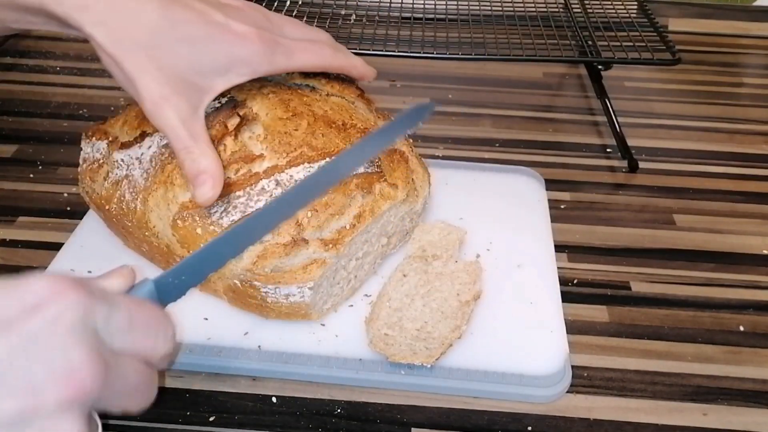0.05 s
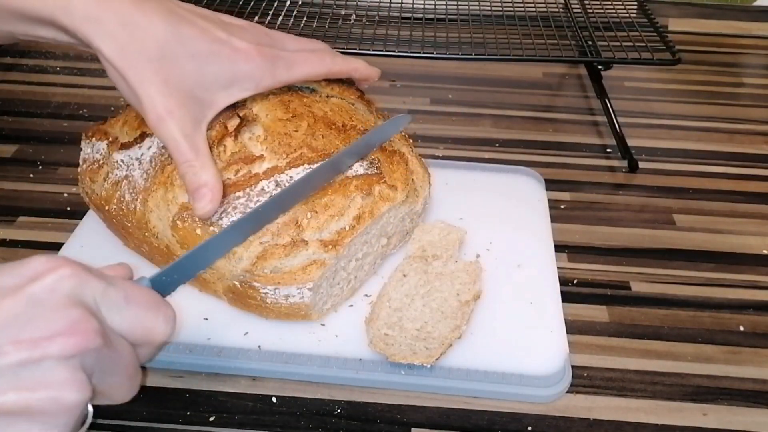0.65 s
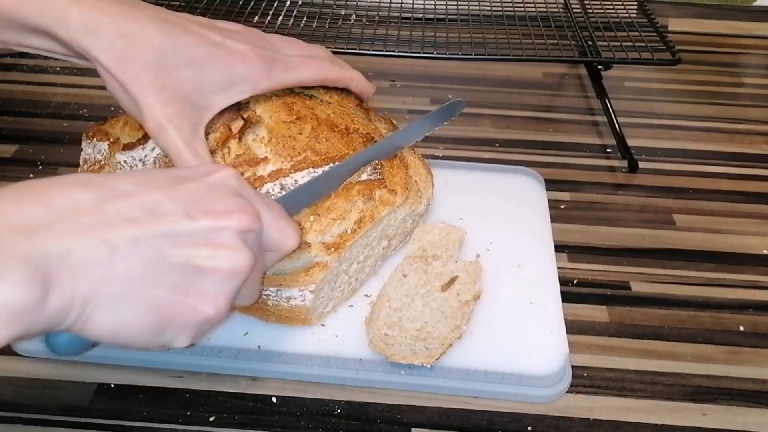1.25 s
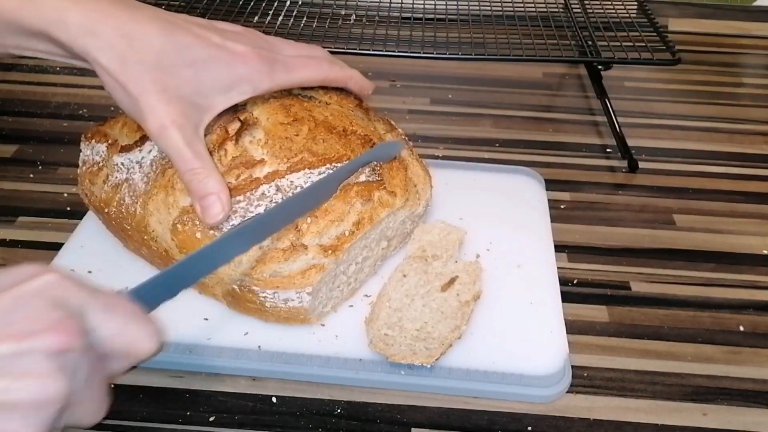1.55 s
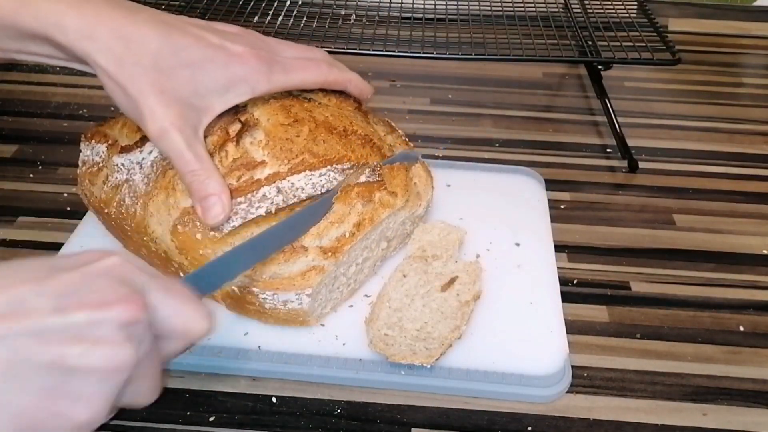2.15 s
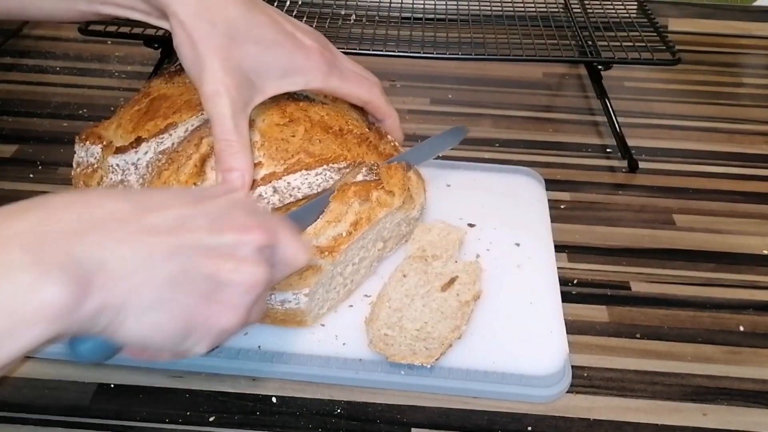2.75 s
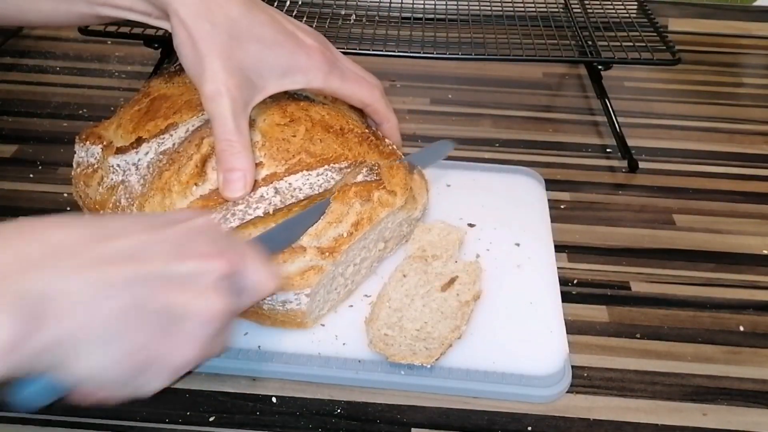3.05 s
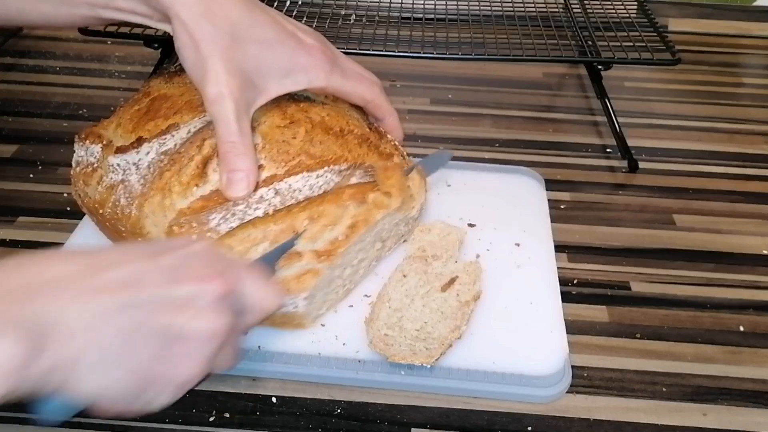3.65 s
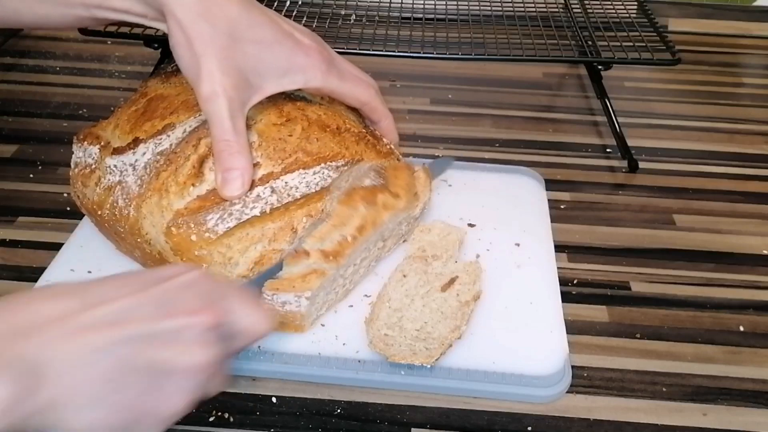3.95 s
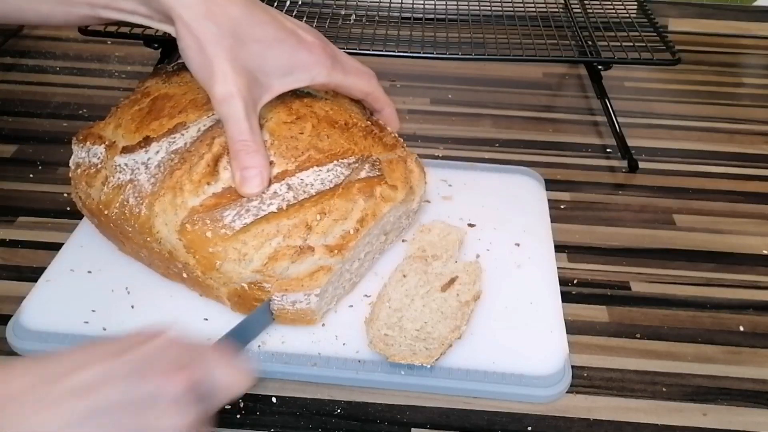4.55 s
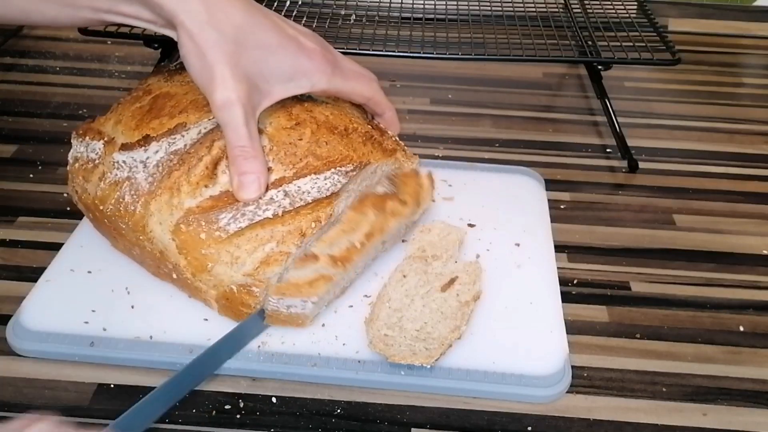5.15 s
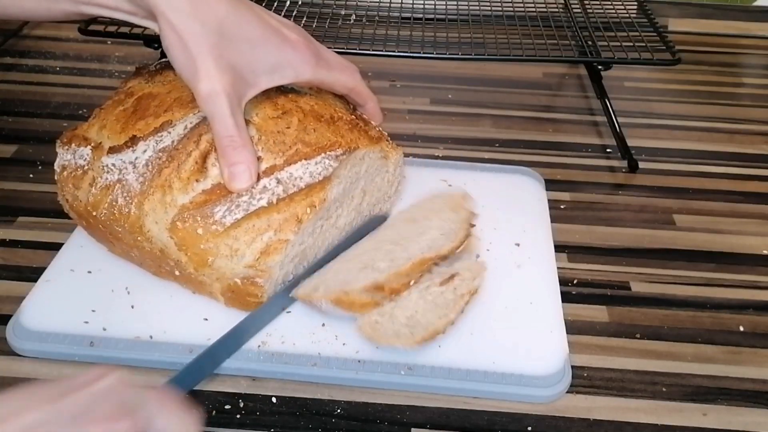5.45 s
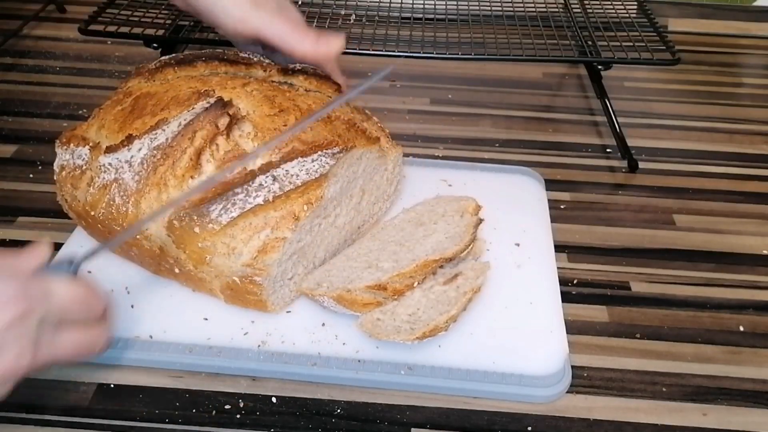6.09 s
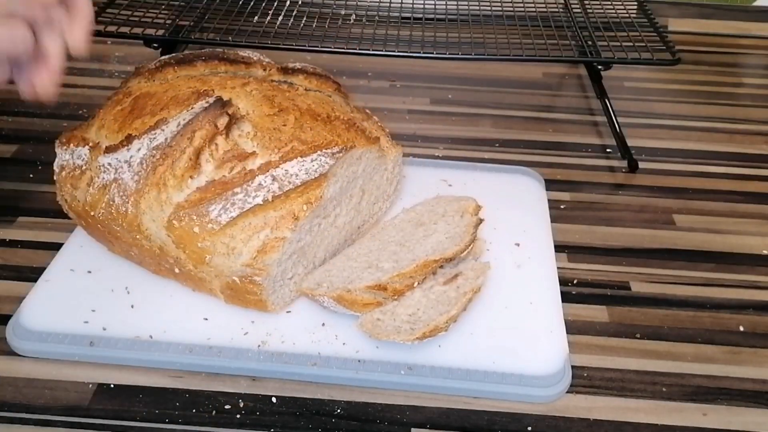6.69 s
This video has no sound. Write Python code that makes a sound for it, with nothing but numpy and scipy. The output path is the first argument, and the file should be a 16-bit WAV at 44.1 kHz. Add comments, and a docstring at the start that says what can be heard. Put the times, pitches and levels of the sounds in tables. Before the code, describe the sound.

A serrated knife saws through a crusty loaf with crackling strokes, catches on a plastic board and scrapes the slice aside.

```python
"""In a small kitchen, close by, a serrated knife saws a crusty loaf on a plastic board.
With each push and pull its teeth crack the crust in clumps of tiny breaks and shake loaf and board.
Now and then a big flake snaps, or the moist inside grips the blade and groans. At the bottom the
blade catches on the board, then scrapes the slice aside. Underneath are the rumble of the rocking
loaf, a faint brushing of hand and blade on the crust, a short echo and a low, steady background."""
import sys
import numpy as np
from scipy import signal
from scipy.fft import rfft, irfft
from scipy.io import wavfile
from scipy.ndimage import uniform_filter1d, map_coordinates

SR = 44100
rng = np.random.default_rng(int(sys.argv[2]) if len(sys.argv) > 2 else 0)


def bounce(signal):
    """Save signal as a 16-bit WAV file at the path given by the first command-line argument."""
    frames = np.transpose(np.atleast_2d(signal))
    limited = np.clip(frames, -1, 1)
    pcm = np.round(limited * 32767).astype(np.int16)
    wavfile.write(sys.argv[1], SR, pcm)


N = 300938

# Levels in the tables are relative: the functions set the final balance.
# each push or pull of the knife: (time of full grip [s], length [s], run-up [s], swell [dB],
# board thump [dB], loaf knock [dB], crunch [dB], splinters [dB], blade ring [dB], pitch of the cut [Hz])
STROKES = [(0.493, 0.07, 0.014, 4, -61.5, -63, -67, -76, -74, 316),
           (0.643, 0.14, 0.0071, 5, -59, -66, -60.5, -60.5, -65, 348),
           (0.957, 0.11, 0.17, 0.5, -53, -51, -53.5, -52, -51.5, 290),
           (1.089, 0.21, .096, -2.5, -48.5, -46.5, -47, -49, -45, 227),
           (1.418, 0.17, .05, -1, -54, -49.5, -51, -46.5, -57, 344),
           (1.717, 0.096, 0.042, 2, -46, -44, -49, -45, -49, 328),
           (1.873, 0.084, 0.025, -2.5, -50.5, -43, -38.5, -43, -45, 510),
           (2.086, 0.11, 0.063, -.5, -47.5, -44, -42.5, -45, -49.5, 211),
           (2.29, 0.05, 0.069, 1, -64.5, -74, -63, -70, -65, 560),
           (2.604, 0.12, 0.087, 1, -53.5, -41.5, -36, -42.5, -41, 550),
           (2.856, 0.098, 0.1, 3.5, -53, -46.5, -43.5, -46.5, -48.5, 564),
           (3.097, .11, 0.081, -8, -48, -45, -42, -45, -48.5, 370),
           (3.317, .1, 0.043, -1.5, -63, -41.5, -44.5, -47.5, -50, 464),
           (3.521, 0.11, .018, 0.5, -51.5, -46.5, -43, -42.5, -61, 350),
           (3.776, 0.065, 0.11, 0, -72, -46.5, -44, -47, -52.5, 390),
           (3.949, 0.13, .014, 6.5, -48.5, -48.5, -46.5, -44.5, -51.5, 222),
           (4.249, 0.019, .13, -1.5, -64.5, -49.5, -49.5, -58, -62, 228),
           (4.358, 0.094, .018, 6, -62, -55.5, -46.5, -52, -49.5, 230),
           (4.6, .037, 0.11, -2, -61, -62, -54.5, -61.5, -54, 190),
           (4.836, 0.018, .12, 0, -62, -60, -50.5, -54.5, -52.5, 602),
           (4.986, 0.13, .11, -11.5, -53.5, -48, -46, -53, -53.5, 547),
           (5.194, 0.077, 0.18, -1, -43.5, -46, -44, -51, -49.5, 530)]
# big flakes of crust snapping: (time [s], level [dB], knock compared with the crack [dB])
SNAPS = [(0.4932, -51, 5), (0.6522, -36, -7), (0.7012, -29, -20), (0.7302, -36, -17), (0.7547, -30, -17),
         (0.8929, -39, -12), (1.0869, -29, -11), (1.1618, -27, -13), (1.2511, -26, -18), (1.3054, -29, -14),
         (1.4062, -33, -15), (1.474, -31, -16), (1.7093, -25, -19), (1.7198, -28, -14), (1.759, -26, -5),
         (1.8721, -29, -4), (2.4445, -38, -14), (2.577, -27, -2), (2.6219, -27, -7), (2.7053, -25, -13),
         (2.9148, -29, -1), (3.0864, -27, -1), (3.1837, -26, -15), (3.3195, -29, 0), (3.4105, -29, 0),
         (3.5144, -34, -5), (3.5584, -28, -6), (3.8672, -27, -20), (3.9464, -32, -13), (4.0785, -29, -3),
         (4.4144, -26, -14), (4.466, -22, -13), (5.0764, -27, -18), (5.437, -31, -20), (5.7902, -35, -24)]
# the teeth catching on the board: (time [s], level [dB], pitch [Hz], time to fade by 60 dB [s])
CATCHES = [(4.411, -42, 1680, 0.27), (4.465, -42.5, 2180, 0.16), (4.855, -38.5, 1290, 0.068),
           (4.974, -34.5, 1090, 0.13), (5.171, -39, 785, 0.33)]
# the flat blade shoving the slice aside:
# (time of full grip [s], length [s], run-up [s], swell [dB], board thump [dB], scrape [dB])
SHOVES = [(5.463, 0.14, .115, -13.5, -51.5, -36.5), (5.69, 0.072, .043, -5, -58.5, -46.5)]
# the soft bread gripping the blade: (middle time [s], length [s], pitch [Hz], level [dB])
GROANS = [(1.175, .12, 215, -45), (1.805, .12, 338, -40), (2.14, .1, 215, -44)]
# the loaf rocking slowly under the hand: (time [s], level [dB])
ROCKING = [(0.6, -85), (0.66, -77), (2.26, -60), (2.28, -69), (3.44, -51.5), (3.93, -68), (4.05, -45),
           (4.18, -61), (5.74, -66), (5.8, -77)]
# hand and blade brushing the floury crust: (middle time [s], half-length [s], level [dB])
BRUSHES = [(.08, .045, -76), (6.355, 0.44, -89), (6.783, 0.039, -77)]

# the notes at which each thing rings: (pitch [Hz], width [Hz], level [dB])
LOAF_NOTES = [(204.5, 31.4, 2.5), (247.4, 23, 0), (295, 22, -0.5), (339, 49, 2.5), (449, 59, -1.5),
              (543, 44, -5.5), (630, 64, -5)]  # the body of the loaf
SHELL_NOTES = [(705, 35, -4), (778, 15, 0.5), (855, 32, -5.5), (941, 32, -4), (1012, 45, -3.5),
               (1302, 124, -6), (1477, 146, -4), (1895, 350, -7), (2090, 310, -7.5)]  # the hollow shell of crust
BLADE_NOTES = [(2740, 250, 6.5), (3640, 450, 1), (5000, 340, -7), (7630, 220, -6), (9700, 230, -9.5)]  # steel, damped by the bread
BOARD_NOTES = [(122.5, 39, 0)]  # the board on the worktop
PLASTIC_NOTES = [(475, 41, -9.5), (615, 9.9, -1.5), (816, 21, -3), (1032, 95, -5), (1310, 170, -7.5),
                 (2195, 130, -6)]  # the plastic under the sliding blade

# the tone of each sound, from bass to treble: (frequency [Hz], level [dB])
CRUNCH_TONE = [(300, -18), (600, 1.5), (900, 7.5), (1400, 0.5), (2500, -3.5), (4000, -27)]  # crust giving way
SPLINTER_TONE = [(1300, -28), (2300, 0.5), (3300, 3), (4200, 0), (5500, 2), (7500, -5.5), (10000, -7),
                 (12000, -15.5), (15000, -25)]  # tiny, bright splinters
CRACK_TONE = [(300, -14), (1200, -2), (3000, -.5), (5500, -5), (10000, -12.5), (15000, -26)]  # a big flake breaking
SCRAPE_TONE = [(200, -8), (450, -0.5), (1100, 1), (2300, -1.5), (3000, -7), (4000, -14), (5200, -17.5),
               (7000, -27), (15000, -52)]  # the slice rubbing over the board
BRUSH_TONE = [(1500, -31), (3000, -3), (7500, -6), (9500, -4), (15000, -17)]  # a light touch on the crust
SCATTER_TONE = [(120, -12), (280, -19.5), (550, -6.5), (1000, -2), (2200, -2.5), (6000, 1.5)]  # sound thrown sideways by the worktop and things on it
ECHO_TONE = [(100, -19.5), (700, -4), (14000, -1)]  # the kitchen's echo, compared with the direct sound
BACKGROUND_TONE = [(15, -15), (25, -7), (60, -9.5), (120, -10), (170, -11.5), (500, -18.5), (1200, -25),
                   (5000, -32), (10000, -42), (15000, -54)]  # the quiet room

RUN_UP_DB, BULGE_DB, STOP_DB_PER_S = 20, 1.8, 207  # a stroke's rise, bump at top speed and final fall
HOLLOW_WIDTH_HZ, HOLLOW_DB = 160, -2.5  # the cut's note; level compared with the loaf's own notes
CRUMBLE_S, GIVE_S, ECHO_S = .017, .04, .19  # times to fade by 60 dB
SAW_SMEAR_S, SNAP_SMEAR_S = .015, .007  # how long the nearest reflections blur a sound
BACKGROUND_DB, TOP_HZ = -69.5, 15300


def sawing():
    """Teeth break the crust; the breaks hiss, ring blade and shell, knock the loaf and shake the board."""
    shake, knock, crunch, splinter, ring = stroke_gains([row[:-1] for row in STROKES])
    # each bite starts a small shower of breaks that dies away
    bite = .55 + teeth(per_s=85, uneven=.6, hold_s=.005, spread_db=4)
    breaks = bite * clicks(per_s=2500, spread_db=4.5)
    grit = coloured(bite * clicks(per_s=2200, spread_db=2), CRUNCH_TONE)
    shell = unit(ringing(breaks, SHELL_NOTES)) + amp(-1.5) * unit(grit)
    loaf = unit(ringing(breaks, LOAF_NOTES)) + amp(HOLLOW_DB) * unit(cut_hollow(breaks))
    crackle = coloured(bite * clicks(per_s=3000, spread_db=2.5), SPLINTER_TONE)
    steel = ringing(bite * clicks(per_s=2600, spread_db=4), BLADE_NOTES)
    return (amp(3.25) * shake * levelled(board_thump(breaks), span_s=.064)
            + amp(.6) * knock * levelled(loaf, span_s=.035)
            + amp(-1.5) * crunch * levelled(shell, span_s=.031)
            + amp(-3.5) * splinter * levelled(crackle, span_s=.039)
            + amp(-3) * ring * levelled(steel, span_s=.04))


def stroke_gains(rows):
    """One loudness curve per level column: a stroke speeds up, grips, and dies as the blade stops."""
    power = np.zeros((len(rows[0]) - 4, N))
    for time, length, run_up, swell_db, *levels_db in rows:
        near = slice(max(round(time * SR) - SR // 2, 0), round(time * SR) + SR // 2)
        t = np.arange(near.start, near.stop) / SR - time
        travel = np.clip(t / length, 0, 1)
        grip_db = swell_db * (travel - .5) + BULGE_DB * (np.sin(np.pi * travel) - 2 / np.pi)
        slack_db = RUN_UP_DB * np.maximum(-t, 0) / run_up + STOP_DB_PER_S * np.maximum(t - length, 0)
        power[:, near] += np.outer(amp(levels_db), amp(grip_db - slack_db)) ** 2
    return np.sqrt(power)


def teeth(per_s, uneven, hold_s, spread_db):
    """Each passing tooth bites at once, then gradually lets go."""
    teeth_passed = np.floor(np.cumsum(per_s * np.exp(uneven * wobble(60))) / SR)
    strength = amp(spread_db * np.clip(rng.standard_normal(N), -2, 2))
    bites = (np.diff(teeth_passed, prepend=0) > 0) * strength
    return unit(signal.lfilter([1], [1, -np.exp(-1 / (hold_s * SR))], bites))


def clicks(per_s, spread_db):
    """Tiny breaks or slips click at random moments: many small, a few large."""
    happens = rng.random(N) < per_s / SR
    size = amp(spread_db * np.clip(rng.standard_normal(N), -3, 2.6))
    return unit(happens * size * rng.choice([-1, 1], N))


def cut_hollow(x):
    """The hollow opened by the cut rings at one pitch per stroke and shifts as the blade turns round."""
    turns = [(when, hz) for time, length, *_, hz in STROKES for when in (time, time + length)]
    pitch = np.interp(np.arange(N) / SR, *np.transpose(turns))
    spin = np.exp(2j * np.pi * np.cumsum(pitch) / SR)
    # slide the pitch down to 0 Hz, keep a narrow band, slide it back up
    band = signal.lfilter(*signal.butter(2, HOLLOW_WIDTH_HZ / 2, fs=SR), x / spin)
    return np.real(spin * band)


def board_thump(x):
    """The board bounces on the worktop at one low pitch."""
    return ringing(ringing(x, BOARD_NOTES), BOARD_NOTES)


def flake_snaps():
    """A flake cracks and crumbles; the crust around it gives way and knocks shell, loaf and board."""
    cracks, knocks = np.zeros((2, N))
    t = np.arange(SR // 20) / SR
    click = t == 0
    for time, db, knock_db in SNAPS:
        start = round(time * SR)
        grit = .16 * rng.standard_normal(len(t))
        cracks[start:start + len(t)] += amp(db) * (click + grit * amp(-60 * t / CRUMBLE_S))
        knocks[start:start + len(t)] += amp(db + knock_db) * (click + grit * amp(-60 * t / GIVE_S))
    crack = amp(11) * coloured(cracks, CRACK_TONE)
    crust = amp(20) * ringing(knocks, SHELL_NOTES) + amp(13) * coloured(knocks, CRUNCH_TONE)
    return crack + crust + amp(26.5) * ringing(knocks, LOAF_NOTES) + amp(25) * board_thump(knocks)


def blade_catches():
    """The edge sticks and slips on the plastic in short, rough chirps."""
    out = np.zeros(N)
    t = np.arange(SR // 4) / SR
    for time, db, hz, fade_s in CATCHES:
        judder = unit(ringing(rng.standard_normal(len(t)), [(hz, .64 * hz, 0)]))
        chirp = unit(ringing(judder, [(hz, .7 * hz, 0)]))
        out[round(time * SR):][:len(t)] += amp(db + 3.5) * chirp * amp(-60 * t / fade_s)
    return out


def sliding_slice():
    """The blade pushes slice and crumbs over the board's grain, and the plastic rings."""
    shake, scrape = stroke_gains(SHOVES)
    judder = .5 + teeth(per_s=180, uneven=.4, hold_s=.0048, spread_db=4)
    slips = judder * clicks(per_s=5400, spread_db=5)
    rub = unit(coloured(judder * clicks(per_s=6000, spread_db=-4.5), SCRAPE_TONE))
    plastic = ringing(slips, PLASTIC_NOTES)
    ring = unit(coloured(plastic, [(200, -13), (450, 4), (2500, -4.5), (5000, -4)]))
    return (amp(-1.75) * scrape * levelled(rub + amp(2) * ring, span_s=.038)
            + amp(1.5) * shake * levelled(board_thump(slips), span_s=.07))


def bread_groans():
    """The moist inside sticks and slips on the blade: a low note that sags as the blade slows."""
    t = np.arange(N) / SR
    pitch_waver = 1 + .04 * wobble(70)
    level_waver = amp(2 * wobble(60))
    out = np.zeros(N)
    for middle, length, hz, db in GROANS:
        on = np.abs(t - middle) < length / 2
        progress = (t[on] - middle) / length  # from -0.5 to 0.5
        pitch = hz * pitch_waver[on] * (1 - .18 * progress)
        note = np.sin(2 * np.pi * np.cumsum(pitch) / SR)
        out[on] += amp(db) * np.cos(np.pi * progress) * note
    return level_waver * out


def rocking_loaf():
    """The pushed loaf and board give a soft, deep rumble."""
    push = amp(np.interp(np.arange(N) / SR, *np.transpose(ROCKING), left=-120, right=-120))
    noise = rng.standard_normal(N)
    rumble = coloured(noise, [(12, 3), (28, -17), (45, 1), (70, 3), (110, -12), (300, -80)])
    return amp(-2.5) * push * levelled(rumble, span_s=.048)


def crust_brushing():
    """Skin and steel pass lightly over the crust with a faint, dry hiss."""
    t = np.arange(N) / SR
    touch = sum(amp(db) * np.exp(-((t - middle) / half) ** 2) for middle, half, db in BRUSHES)
    return touch * unit(coloured(clicks(per_s=3200, spread_db=5), BRUSH_TONE))


def kitchen(x, smear_s):
    """Add nearby reflections and a short echo, in stereo; their paths change as the cut moves along."""
    hop, length = SR // 10, SR // 5
    t = np.arange(length) / SR
    crossfade = signal.get_window("hann", 2 * hop)
    near = amp(-60 * t / smear_s)
    tail = amp(-60 * t / ECHO_S) * (1 - np.exp(-t / .0028))
    reflected = np.zeros((3, N + SR))  # nearby scatter, left echo, right echo
    for start in range(0, N - 2 * hop, hop):
        paths = rng.standard_normal((3, length)) * [near, tail, tail]
        paths /= np.linalg.norm(paths, axis=1, keepdims=True)
        piece = signal.fftconvolve([x[start:start + 2 * hop] * crossfade], paths, axes=1)
        reflected[:, start:start + piece.shape[1]] += piece
    side = coloured(reflected[0, :N], SCATTER_TONE)
    return np.array([x + side, x - side]) + coloured(reflected[1:, :N], ECHO_TONE)


def background():
    """A low, steady noise, spread wide between the ears."""
    mid, side = coloured(rng.standard_normal((2, N)), BACKGROUND_TONE)
    side = coloured(side, [(60, .5), (250, -3), (800, -1), (8000, .5)])
    return amp(BACKGROUND_DB) * np.array([mid + side, mid - side]) / np.std(mid)


def amp(db):
    """Turn decibels into a number to multiply by."""
    return 10 ** (np.asarray(db) / 20)


def unit(x):
    """Scale a sound to an average power of 1."""
    return x / np.sqrt(np.mean(x ** 2) + 1e-20)


def levelled(x, span_s):
    """Hold the power near 1 over span_s seconds, keeping the quicker grain."""
    size = max(int(span_s * SR), 2)
    power = uniform_filter1d(uniform_filter1d(x * x, size), size)
    return x / np.sqrt(np.abs(power) + 1e-12)


def wobble(per_s):
    """A smooth curve through per_s random points a second."""
    points = rng.standard_normal(int(N * per_s / SR) + 4)
    return map_coordinates(points, [np.arange(N) * per_s / SR])


def ringing(x, notes):
    """Let x ring an object's notes, added with alternating signs."""
    return sum((-1) ** k * amp(db) * signal.lfilter(*signal.iirpeak(hz, hz / width, SR), x)
               for k, (hz, width, db) in enumerate(notes))


def coloured(x, tone):
    """Filter x to a tone given as (frequency [Hz], level [dB]) points."""
    size = 4096
    hz, db = np.transpose(tone)
    curve_db = np.interp(np.log(np.fft.rfftfreq(size, 1 / SR) + 1), np.log(hz + 1), db)
    # fold the filter in time so that nothing sounds before its cause
    cepstrum = irfft(np.log(amp(curve_db)))
    cepstrum[1:size // 2] *= 2
    cepstrum[size // 2 + 1:] = 0
    kernel = irfft(np.exp(rfft(cepstrum)))
    return signal.oaconvolve(x, np.array(kernel, ndmin=x.ndim), axes=-1)[..., :x.shape[-1]]


def scene():
    """Mix everything in the kitchen; knife, loaf and board sit a little to the right."""
    rubbing = (sawing() + blade_catches() + sliding_slice()
               + rocking_loaf() + bread_groans() + crust_brushing())
    cutting = kitchen(rubbing, SAW_SMEAR_S) + kitchen(flake_snaps(), SNAP_SMEAR_S)
    return cutting * amp([[-.5], [.4]]) + background()


def record(dry):
    """Cut the highest treble, above TOP_HZ."""
    return signal.oaconvolve(dry, signal.firwin(401, TOP_HZ, fs=SR)[None], mode="same", axes=1)


dry = scene()
out = record(dry)
bounce(out)
```